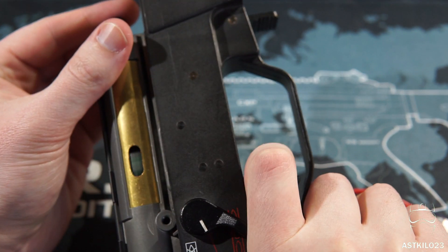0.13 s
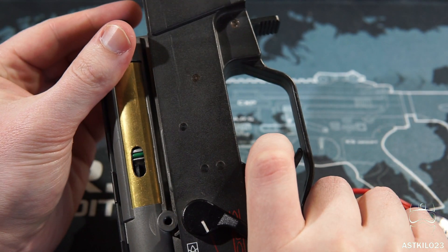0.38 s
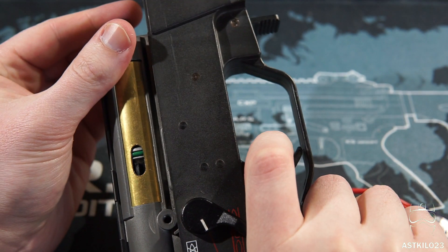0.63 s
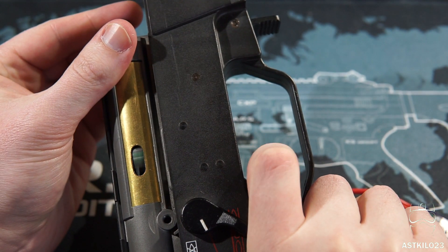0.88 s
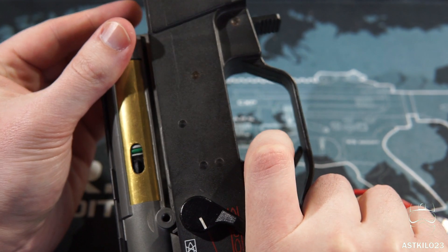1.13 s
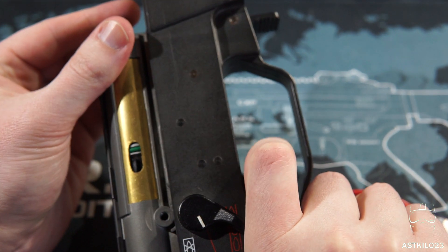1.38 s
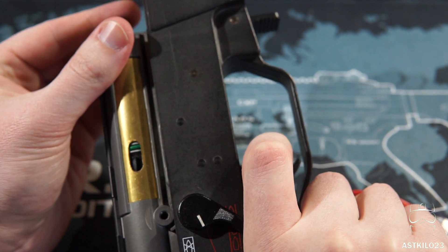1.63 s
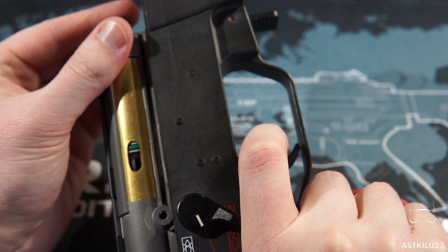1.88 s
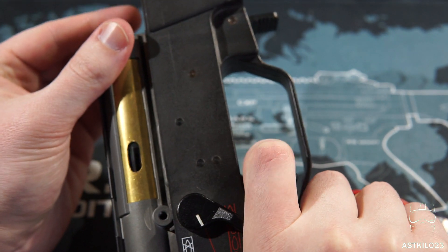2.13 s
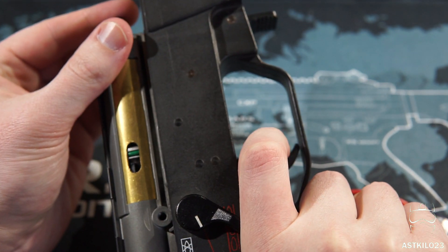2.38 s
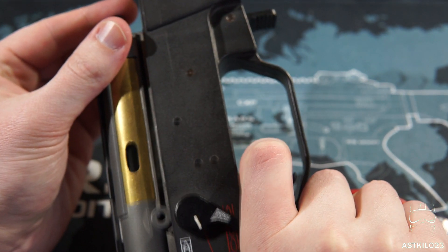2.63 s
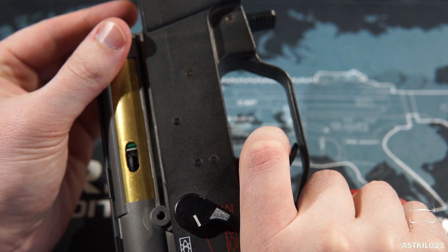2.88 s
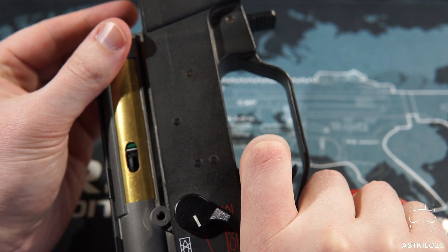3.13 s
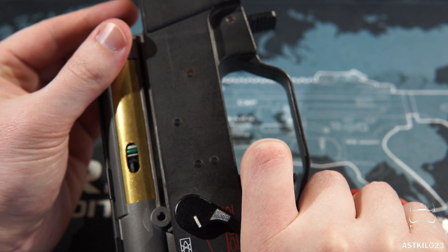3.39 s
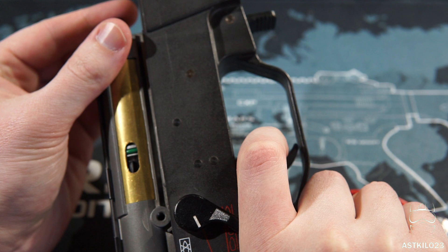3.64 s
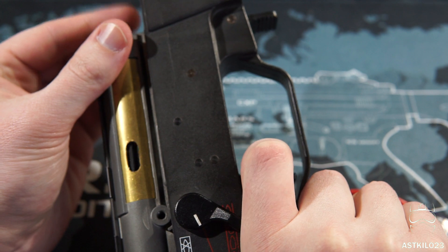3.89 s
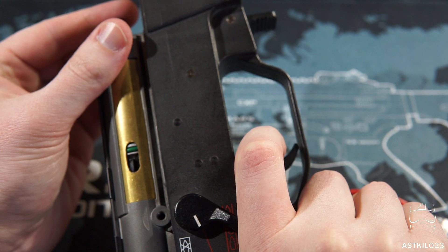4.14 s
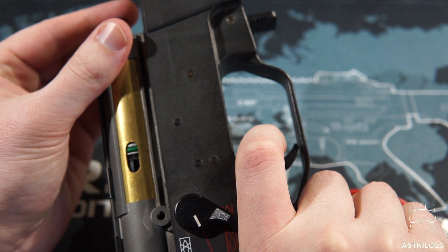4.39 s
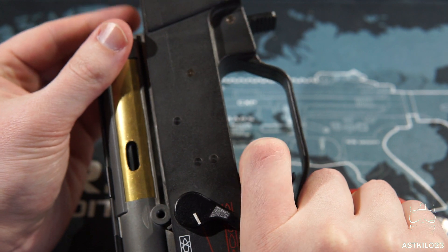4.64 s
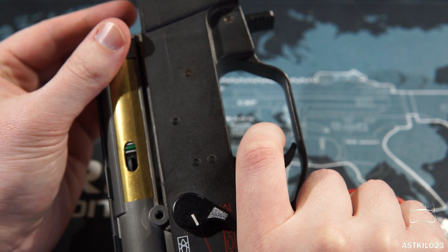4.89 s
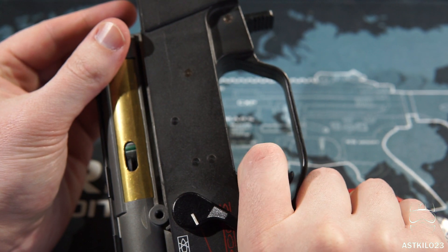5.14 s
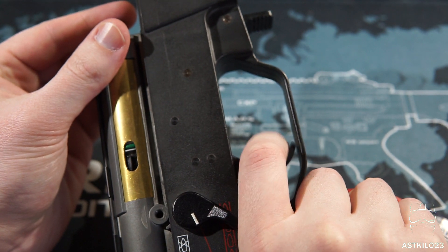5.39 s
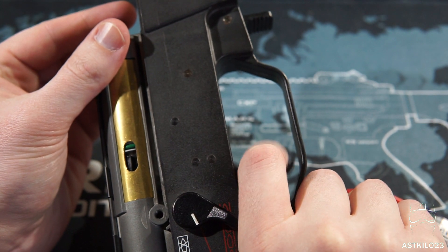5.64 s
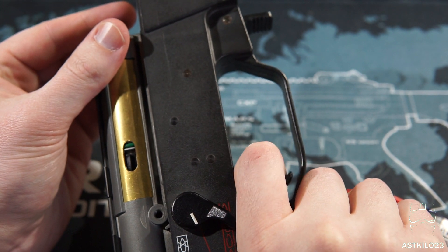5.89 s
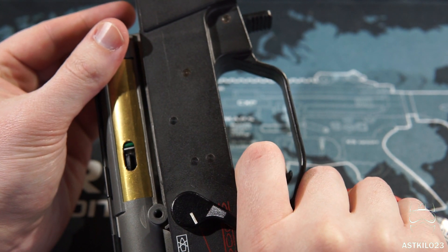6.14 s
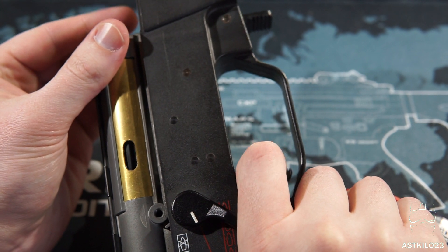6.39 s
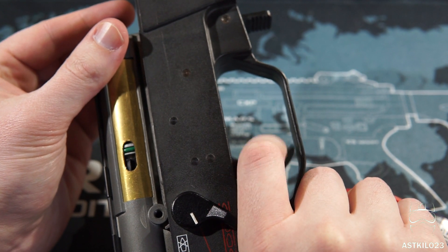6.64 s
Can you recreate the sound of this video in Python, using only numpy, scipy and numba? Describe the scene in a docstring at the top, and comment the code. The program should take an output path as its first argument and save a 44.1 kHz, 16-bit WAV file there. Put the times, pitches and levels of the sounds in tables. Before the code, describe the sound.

Close stereo sound of a gun mechanism on a desk mat: tiny trigger ticks, then a short electric whirr with grinding hiss, a hard chattering thump and a metallic clack, all within about a third of a second. This repeats eleven times, roughly every half to three quarters of a second, with bright plastic trigger snaps between shots, short room echoes and a low, steady background rumble.

```python
"""An electric airsoft gearbox lies on a desk mat close to a stereo microphone and is dry-fired eleven times.
The trigger clicks, then the motor spins up: meshing teeth whine, rattle the shell and hiss.
The gears let the piston go; it draws air, slams home and chatters while the gears coast until a latch catches.
The trigger springs back after most shots and clicks again before the next one. A small room answers throughout,
over a low rumble, hum and hiss, and gain control ducks it all under the loud parts."""
import sys
import numpy as np
from scipy import signal
from scipy.fft import rfft, irfft
from scipy.io import wavfile
from scipy.ndimage import uniform_filter1d
from numba import njit

SR = 44100
rng = np.random.default_rng(int(sys.argv[2]) if len(sys.argv) > 2 else 0)


def to_linear_factor(level_db):
    """Convert decibel levels (scalar or array-like) to linear amplitude factors."""
    exponent = np.asarray(level_db, float) / 20
    return 10 ** exponent


def transcribe(u):
    """Save the signal u as a 16-bit wav file named by the first command-line argument.

    u: samples, shape (n,) or (channels, n), limited to [-1, 1]; the rate is SR.
    q: integer samples, one column per channel.
    """
    v = np.clip(np.atleast_2d(u).T, -1, 1)
    q = np.round(v * 32767).astype(np.int16)
    wavfile.write(sys.argv[1], SR, q)


N = 297675  # samples
T = np.arange(N) / SR  # seconds

# Table levels are relative; each source sets its own balance.
# Motor starts, with the jolt of the pinion: start_s, effort_db, jolt_db
MOTOR_STARTS = [(0.2561, -8, -9.5), (1.0192, -5.5, -13), (1.5747, -6, 2), (2.1784, -7.5, -20),
                (2.7401, -6, -11.5), (3.3212, -6, -4.5), (3.9465, -7.5, -4.5), (4.6854, -7, -18),
                (5.2768, -7, -8.5), (5.8347, -5, -15.5), (6.4372, -7.5, -12)]
# The gear lets the piston go: release_s, slam_db
PISTON_RELEASES = [(0.303, -7.5), (1.061, 0.5), (1.6175, -1), (2.2255, -2), (2.7799, -1.5), (3.3666, -3.5),
                   (3.9895, -5), (4.7326, -5.5), (5.32, -4), (5.878, -2), (6.484, -7)]
# The latch stops the coasting gears, with a knock in the shell: latch_s, clack_db, knock_db
LATCH_CATCHES = [(0.399, -7.5, -21), (1.1656, -5, -8), (1.727, -8, -5), (2.3204, -7, -17),
                 (2.8976, 1.5, -13.5), (3.4758, 2, -8), (4.0846, -23, -28), (4.835, -3, -9),
                 (5.4364, 1.5, -13), (5.9958, 3.5, -6), (6.5983, -4, -6.5)]
# The released trigger springs back against its stop: start_s, level_db
TRIGGER_RETURNS = [(0.4867, 7), (1.2307, 5), (1.794, 5), (2.3986, 4.5), (2.9996, 5), (3.68, 3), (4.149, 5),
                   (4.923, 5.5), (5.5254, 5.5), (6.5826, 5)]
# The finger takes up and jiggles the trigger: start_s, level_db, pitch_hz, knock_db
TRIGGER_CLICKS = [(0.2134, -18, 9000, -29), (0.7572, -48.5, 10500, -50), (0.851, -47, 6400, -46),
                  (0.946, -27.5, 8400, -38.5), (1.4782, -22.5, 9100, -40), (1.5341, -14, 7200, -19),
                  (2.1334, -24, 8730, -37), (2.605, -24, 8500, -34), (2.7035, -28.5, 7198, -29),
                  (3.113, -35.5, 8200, -41), (3.64, -31, 7000, -39), (3.651, -30.5, 7800, -34),
                  (3.67, -42, 9000, -47), (3.8782, -27.5, 8400, -38.5), (4.630, -42, 6000, -36),
                  (4.6389, -23.5, 10130, -38), (4.676, -30, 6500, -53), (5.2021, -28.5, 8150, -43.5),
                  (5.5897, -21, 8840, -32.5), (5.6501, -23, 7300, -25.5), (5.7386, -23, 5800, -30),
                  (5.7582, -21.5, 8570, -33), (5.7997, -8, 7200, -15.5), (6.125, -18, 7730, -27.5),
                  (6.139, -35, 9070, -22.5), (6.1806, -18.5, 8150, -34), (6.2238, -9, 7200, -16.5),
                  (6.339, -19.5, 8000, -28), (6.3543, -23, 7000, -23.5), (6.395, -17.5, 8850, -32),
                  (6.6683, -10, 7100, -16.5)]
# Dull tap on the desk: start_s, level_db, pitch_hz, knock_db, knock_hz, knock_ms
DESK_TAPS = [(2.0729, -51.5, 5500, -21, 1300, 9.7)]

# Swells on the clock of a standard cycle: peak_ms, level_db, rise_db_per_ms, hold_ms, fall_db_per_ms
WHINE_SWELLS = [(21.6, 5.5, 0.81, 5.3, 0.9), (51.5, 15, 5, .1, 1.07), (122, -13, 0.2, 7.2, 0.5)]  # spin-up, unloaded, coasting
RATTLE_SWELLS = [(4.24, 1.3, 9, 0.105, 0.32), (47.1, 4, 4.8, 14.7, 0.81), (148.7, -3.5, 1.76, 0.068, 0.86),
                 (166, -19.5, 0.2, 36.6, 0.49)]  # start, slam, latch, run-out
HISS_SWELLS = [(18, 6, 2.6, 8, .3), (68.7, 0.5, 0.14, 23, 1.2), (153, -4.5, 1.8, .1, 2.5),
               (159.5, -26, 0.082, 35, 0.47)]  # loaded, free, latch, run-out
# Second and third harmonic of the whine, against its fundamental: level_db
WHINE_HARMONICS = (-8, -18)
# The piston lands and chatters twice, against the slam: level_db
PISTON_BOUNCES = [3, 2, 0]

# Modes of gearbox shell and desk: pitch_hz, level_db, t60_s
SHELL_MODES = [(234, -2.5, 0.14), (296.5, 2, 0.043), (628, 11, 0.0044), (663, -3, 0.036), (829, -3, 0.011),
               (1017, -6.5, 0.023), (1280, -75, 0.012), (1497, 2.5, 0.014), (1716, 5.5, 0.016),
               (2217, -9, 0.036), (2570, 6, 0.0046), (3430, -3.5, 0.036)]
# Barrel and spring that keep singing: pitch_hz, level_db, t60_s
SINGING_MODES = [(684, -65, 3.5), (920, -51.5, 0.63), (993, -56.5, 0.46), (1357, -61.5, 6.3),
                 (1716, -33.5, 0.23), (1900, -56.5, 0.91), (2693, -62, 0.86)]
# Spectrum of the gear hiss: frequency_hz, density_db
GEAR_SPECTRUM = [(1180, 4.5), (2000, -7), (2180, -18), (3040, -4.5), (3370, 2), (4050, 0), (6940, 2.5),
                 (7570, 5.5), (9090, -3), (9920, -3), (11200, -5), (13200, -2), (16000, -24)]
# Spectrum of the contact snaps: frequency_hz, density_db
SNAP_SPECTRUM = [(1470, -41), (2500, -8), (4800, 16), (6300, -1), (8530, 6), (10000, 1.5), (10900, 1),
                 (12700, 10), (16000, -26)]
# Balance of the two sides for the gun: frequency_hz, left_minus_right_db
SIDE_BALANCE = [(60, 0.0), (110, 0.0), (200, 0.0), (380, 0.5), (700, 1.5), (1290, 4.0), (2380, 2.0),
                (4400, -1.5), (8120, -4.5), (15000, -6.5)]
# Spectrum of the low rumble: frequency_hz, density_db
RUMBLE_SPECTRUM = [(12, -5), (20, 2), (58, -0.5), (90, -11.5), (121, -20.5), (258, -22.5), (305, -20),
                   (376, -22.5), (677, -30.5), (967, -33.5), (1380, -44), (1530, -34.5), (3000, -64.5),
                   (3900, -82), (6600, -120)]
# Steady hum tones: pitch_hz, peak_db
HUM_TONES = [(118.4, -46.5), (306.8, -63.5), (543.7, -56), (775.2, -56.5)]
# Spectrum of the background hiss: frequency_hz, density_db
HISS_SPECTRUM = [(1200, -47), (2000, 7.5), (3000, 5.5), (6000, 3.5), (16000, -0.5)]


def level(x, db):
    """Scale to an rms level."""
    return x * to_linear_factor(db) / np.sqrt(np.mean(x ** 2))


def curve(points):
    """Read (Hz, dB) points at every bin, along a log frequency axis."""
    hz, db = np.transpose(points)
    return np.interp(np.log(np.fft.rfftfreq(N, 1 / SR) + 1), np.log(hz + 1), db)


def colour(x, points):
    """Filter by a spectrum, keeping the power of white noise."""
    gain = to_linear_factor(curve(points))
    return irfft(rfft(x) * gain / np.sqrt(np.mean(gain ** 2)), N)


def modes(x, table):
    """Decaying resonators; a unit tap rings each at its dB."""
    out = 0
    for hz, db, t60 in table:
        radius = np.exp(-np.log(1000) / (t60 * SR))
        w = 2 * np.pi * hz / SR
        ring = signal.lfilter([0, np.sin(w)], [1, -2 * radius * np.cos(w), radius ** 2], x)
        out = out + to_linear_factor(db) * ring
    return out


def band(x, lo_hz, hi_hz):
    """Butterworth band-pass, second order at each edge."""
    return signal.sosfilt(signal.butter(2, [lo_hz, hi_hz], "bandpass", fs=SR, output="sos"), x)


def walk(rate):
    """Smooth random wander, rms 1, from noise averaged twice over 1/rate seconds."""
    size = int(SR / rate)
    return level(uniform_filter1d(uniform_filter1d(rng.standard_normal(N), size), size), 0)


def add(track, s, grain):
    """Lay a grain into a track."""
    i = int(s * SR)
    track[i:i + len(grain)] += grain[:N - i]


def burst(rise_ms, fall_ms):
    """A scrape that swells to the contact and dies away; equal power for equal length."""
    ms = np.arange(1500) / SR * 1000
    rise = (ms / max(rise_ms, .05)) ** 2
    shape = np.where(ms < rise_ms, rise, np.exp(-(ms - rise_ms) / fall_ms))
    grain = shape * rng.standard_normal(1500)
    return grain * np.sqrt(np.sum(shape ** 2) / np.sum(grain ** 2))


def push(ms):
    """Half-sine contact force of unit area."""
    samples = ms * SR / 1000
    force = np.sin(np.pi * np.arange(.5, samples) / samples)
    return force / force.sum()


def swells(ms, table):
    """Sum of rise-hold-fall envelopes, straight in dB."""
    return sum(to_linear_factor(db - rise * np.maximum(peak - ms, 0) - fall * np.maximum(ms - peak - hold, 0))
               for peak, db, rise, hold, fall in table)


def tooth_rate(ms, latch_ms):
    """Tooth rate in Hz: spins up from a crawl, settles to coasting, runs down after the latch."""
    crawl_hz, top_hz, coast_hz = 452.6, 1181.6, 926
    spin_up_ms, settle_ms, sag_hz_per_ms = 28, 16, 4.5
    spin_up = crawl_hz + (top_hz - crawl_hz) * ms / spin_up_ms
    settle = coast_hz + (top_hz - coast_hz) * np.exp((spin_up_ms - ms) / settle_ms)
    return np.minimum(spin_up, settle - sag_hz_per_ms * np.maximum(ms - latch_ms, 0))


def gear_cycles():
    """Tooth rate and the swells of whine, rattle and hiss through all eleven cycles."""
    release_ms, cut_off_ms, latch_ms, cycle_ms = 44, 97, 150, 245  # standard cycle
    hz = np.full(N, 500.)
    tracks = np.zeros((3, N))
    for (start, effort_db, _), (release, *_), (latch, *_) in zip(MOTOR_STARTS, PISTON_RELEASES, LATCH_CATCHES):
        # each cycle has its own wind-up and coasting time; power is cut a set time after the release
        cut_off = release + (cut_off_ms - release_ms) / 1000
        ms = np.interp(T, [start, release, cut_off, latch, latch + 1],
                       [0, release_ms, cut_off_ms, latch_ms, latch_ms + 1000])
        on = (T >= start) & (ms < cycle_ms)
        hz[on] = tooth_rate(ms[on], latch_ms)
        for track, table in zip(tracks, (WHINE_SWELLS, RATTLE_SWELLS, HISS_SWELLS)):
            track[on] = to_linear_factor(effort_db) * swells(ms[on], table)
    return hz, *tracks


def gear_whine(phase, whine):
    """Tone at the tooth rate with its second and third harmonic, blooming as it crosses shell modes."""
    tone = np.sin(phase)
    for k, db in zip((2, 3), WHINE_HARMONICS):
        tone = tone + to_linear_factor(db) * np.sin(k * phase)
    tone = to_linear_factor(3.0 * walk(680)) * tone
    sung = modes(whine * tone, SHELL_MODES) / np.std(modes(tone, SHELL_MODES))
    return 0.82 * band(whine * tone, 214, 4300) + 0.47 * band(sung, 570, 4000)


def gear_rattle(teeth, rattle):
    """Noise pulsing once a tooth shakes the shell modes."""
    shake = teeth * rng.standard_normal(N)
    shake = band(band(shake, 344, 5800), 370, 6000)  # too quick to move the desk
    return modes(rattle * shake, SHELL_MODES) / np.std(modes(shake, SHELL_MODES))


def gear_hiss(teeth, hiss):
    """Grinding noise pulsing once a tooth, with a rougher wander on top."""
    # several gear pairs hiss at once, so each port hears its own blend
    grit = rng.standard_normal(N) + 0.87 * band(rng.standard_normal((2, N)), 1100, 18000)
    grind = hiss * teeth * to_linear_factor(2.5 * walk(90)) * grit
    return band(colour(grind, GEAR_SPECTRUM), 900, .45 * SR)


def gears():
    """Meshing teeth: one unsteady rotation drives the whine, the shell rattle and the hiss."""
    hz, whine, rattle, hiss = gear_cycles()
    phase = 2 * np.pi * np.cumsum(hz * (1 + .08 * walk(276.2))) / SR
    teeth = (1 + 0.35 * np.cos(phase)) * to_linear_factor(1.8 * walk(780))
    return gear_whine(phase, whine) + gear_rattle(teeth, rattle) + gear_hiss(teeth, hiss)


def piston():
    """Snap of the last tooth, air drawn after the flying piston and puffed out, then the chattering slam."""
    travel_ms, bounce_ms, draw_ms, puff_ms = 5.6, 2.7, 3.2, 1.8
    snap_db, draw_db, puff_db = 27, 51, 41  # over the slam
    snap, air, blow = np.zeros((3, N))
    for s, slam_db in PISTON_RELEASES:
        land = s + travel_ms / 1000
        add(snap, s, to_linear_factor(slam_db + snap_db) * burst(.4, 1.6))
        add(air, land - draw_ms / 1000, -to_linear_factor(slam_db + draw_db) * push(draw_ms))
        add(air, land, to_linear_factor(slam_db + puff_db) * push(puff_ms))
        for k, db in enumerate(PISTON_BOUNCES):
            add(blow, land + k * bounce_ms / 1000, to_linear_factor(slam_db + db) * push(0.45))
    singing = to_linear_factor(3.0 * walk(40)) * modes(blow, SINGING_MODES)
    return band(snap, 9000, 11000) + band(air, 200, 1800) + modes(blow, SHELL_MODES) + singing


def contacts():
    """List every contact: start_s, snap_db, snap_hz, knock_db, knock_hz, knock_ms, rise_ms."""
    hits = [(s, db, 7500, db, 600, 2.5, .8) for s, _, db in MOTOR_STARTS]
    hits += [(s, db, 7000, knock_db, 900, 4.0, 3.0) for s, db, knock_db in LATCH_CATCHES]
    hits += [(s, db, 9400, db - 20, 1700, 3.4, 1.1) for s, db in TRIGGER_RETURNS]
    hits += [(*row, 1535, 3.4, 1.1) for row in TRIGGER_CLICKS]
    return hits + [(*row, 1.1) for row in DESK_TAPS]


def clicks():
    """Short plastic and steel contacts: a bright snap, a woody knock, and the bare tick the walls hear."""
    knock_span = 1.45  # a knock fills this ratio below and above its pitch
    snap, knock, tick = np.zeros((3, N))
    for s, db, hz, knock_db, knock_hz, knock_ms, rise_ms in contacts():
        # a first touch, then the full contact
        grain = burst(rise_ms, 1.0) + 0.94 * burst(0.26, 0.55)
        pitched = band(grain, 0.78 * hz, 1.147 * hz)
        add(snap, s, to_linear_factor(db) * (1.3 * grain + 2.04 * pitched))
        thud = band(burst(rise_ms, knock_ms), knock_hz / knock_span, knock_hz * knock_span)
        add(knock, s + rise_ms / 2000, to_linear_factor(knock_db) * thud)
        add(tick, s + rise_ms / 1000, np.array([to_linear_factor(db + 25)]))
    shell = to_linear_factor(-21.5) * modes(knock, SHELL_MODES) + to_linear_factor(16.0) * knock
    # the ring wavers at random in level
    singing = to_linear_factor(-21.0 + 2.86 * walk(74)) * modes(tick, SINGING_MODES)
    return colour(snap, SNAP_SPECTRUM) + shell + singing, band(tick, 3560, 10500)


def near_sound(x):
    """The gun stands nearer the right port, which hears it earlier and brighter."""
    left_lag_s = 0.12 / 1000
    tilt = to_linear_factor(curve(SIDE_BALANCE) / 2)
    lag = np.exp(-2j * np.pi * np.fft.rfftfreq(N, 1 / SR) * left_lag_s)
    return irfft(rfft(x) * np.array([tilt * lag, 1 / tilt]), N)


def room(x, t60=0.33, treble_t60=0.16, wet_db=-14):
    """Dense echoes of a small room as decaying noise; the bass is nearly alike at both sides."""
    t = T[:SR // 2]
    noise = rng.standard_normal((2, 2, len(t)))
    low = band(noise[0, 0] + 0.3 * noise[0], 91, 1930) * to_linear_factor(-60 * t / t60)
    high = band(noise[1], 1900, 21900) * to_linear_factor(-60 * t / treble_t60) * to_linear_factor(8.0)
    echoes = (low + high) * (1 - np.exp(-t / 0.00043))
    echoes *= to_linear_factor(wet_db) / np.sqrt(np.sum(echoes ** 2) / 2)
    return signal.fftconvolve(x, echoes, axes=1)[:, :N]


def rumble():
    """Low noise, mostly alike at both sides, whose shared part wavers in level."""
    rumble_db = -31  # rms
    mid = colour(rng.standard_normal(N), RUMBLE_SPECTRUM) * to_linear_factor(2.5 * walk(3.6))
    side = band(colour(rng.standard_normal(N), RUMBLE_SPECTRUM), 96.7, 6000)
    return level(mid, rumble_db) + np.outer([1, -1], level(side, rumble_db - 23.5))


def hum():
    """Faint steady sine tones, alike at both sides."""
    return sum(to_linear_factor(db) * np.sin(2 * np.pi * hz * T) for hz, db in HUM_TONES)


def background_hiss():
    """Steady coloured noise, unrelated at the two sides."""
    return level(colour(rng.standard_normal((2, N)), HISS_SPECTRUM), -56)


def scene():
    """Gearbox and clicks heard directly, their echoes, and the background."""
    works = gears() + piston()
    snaps, ticks = clicks()
    background = rumble() + hum() + background_hiss()
    return near_sound(works + snaps) + room(works + ticks) + background


@njit
def duck(x, top, ratio, attack, release):
    """Gain from an envelope follower: fast down, slower up, compressing by ratio above top."""
    gain, envelope = np.empty(len(x)), top
    for i in range(len(x)):
        envelope += (x[i] - envelope) * (attack if x[i] > envelope else release)
        gain[i] = min(top / envelope, 1.) ** (1 - 1 / ratio)
    return gain


def top_cut(x):
    """Nothing passes above the cut-off."""
    return signal.sosfilt(signal.butter(12, 16880, fs=SR, output="sos"), x)


def record(dry):
    """Gain control follows the louder side and ducks both; the highest peaks clip."""
    attack_s, release_s, clip_at = .0015, 0.022, .88
    louder = np.abs(dry).max(axis=0)
    gain = duck(louder, to_linear_factor(-13.5), 3.95, 1 / (attack_s * SR), 1 / (release_s * SR))
    mix = np.clip(dry * gain, -clip_at, clip_at)
    return top_cut(mix)


dry = scene()
out = record(dry)
transcribe(out)
```